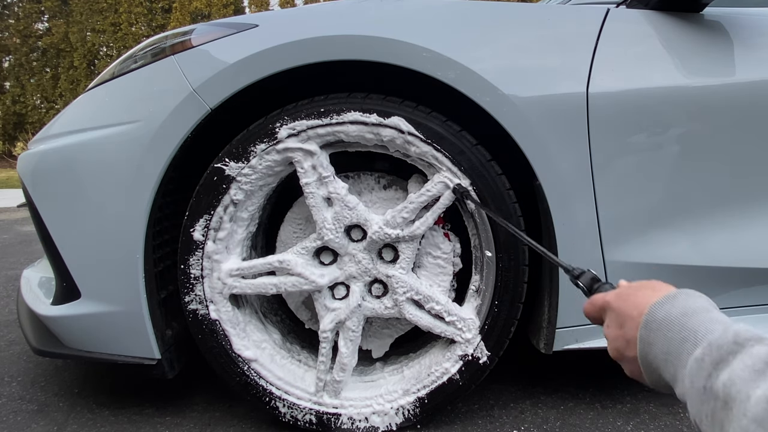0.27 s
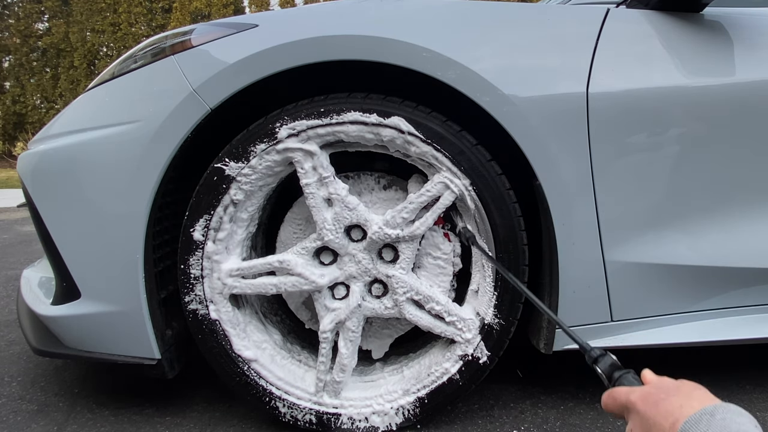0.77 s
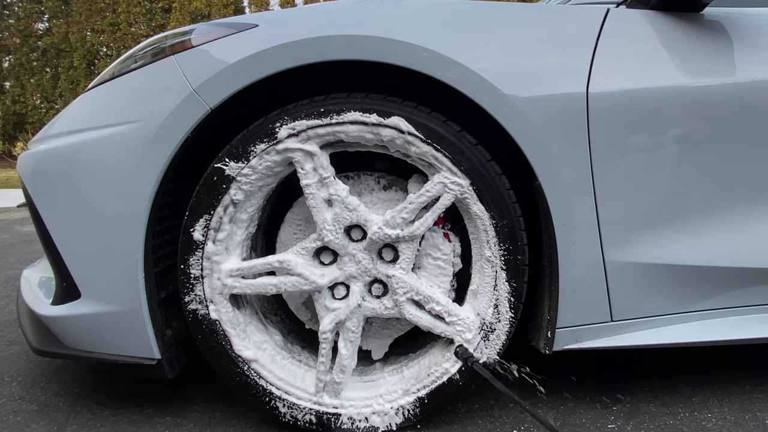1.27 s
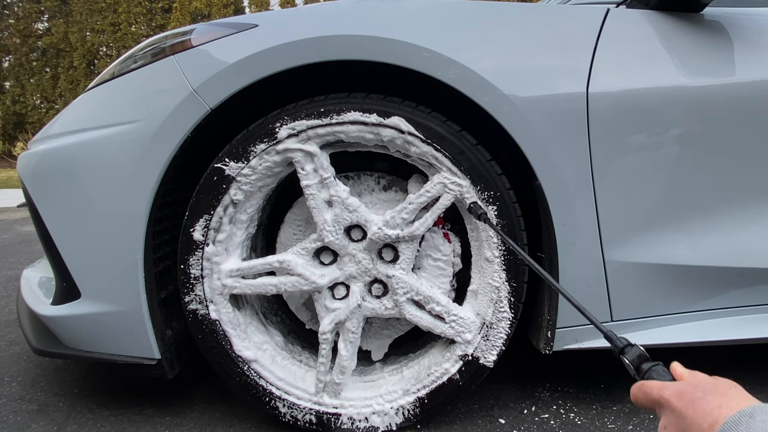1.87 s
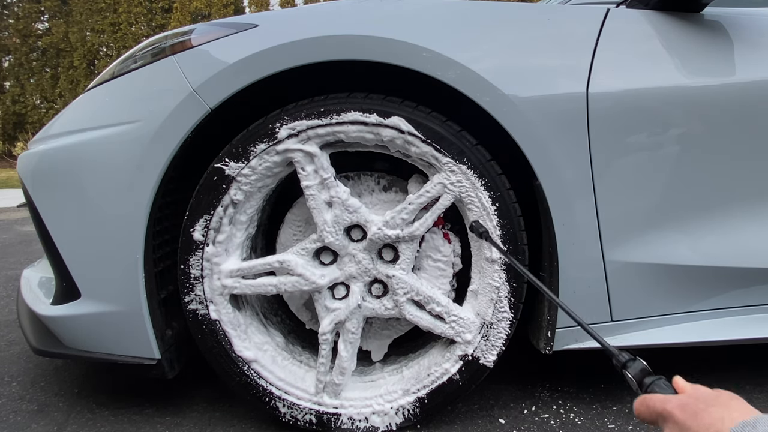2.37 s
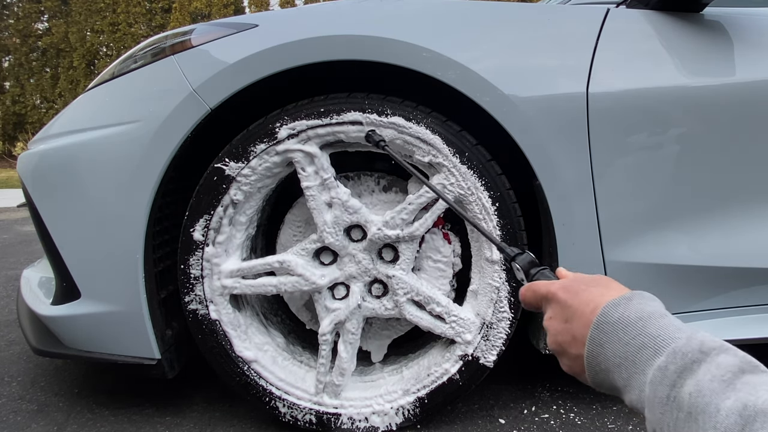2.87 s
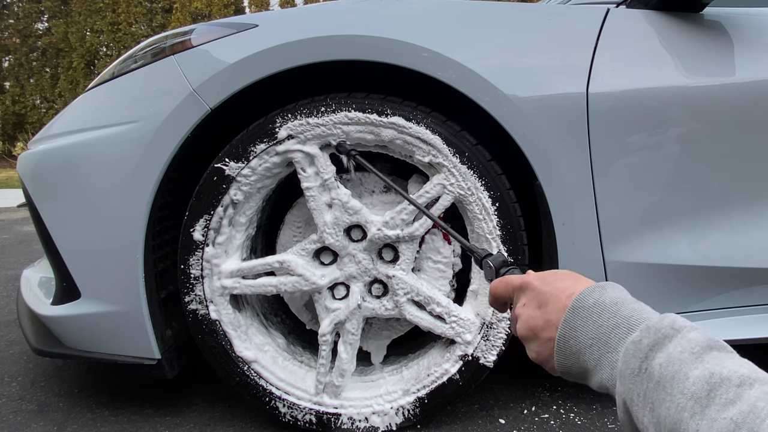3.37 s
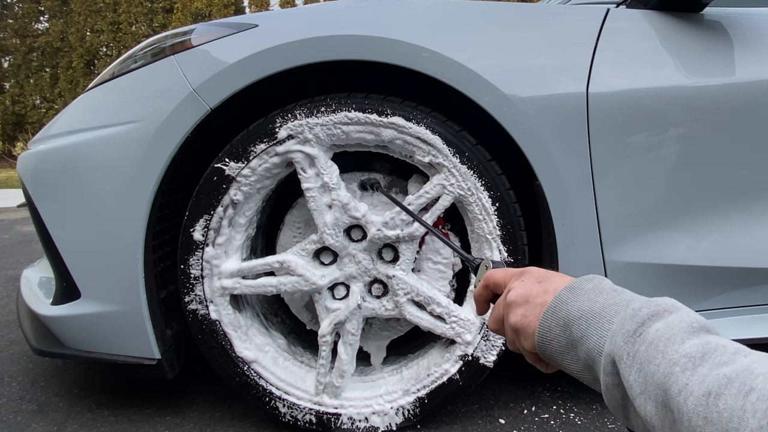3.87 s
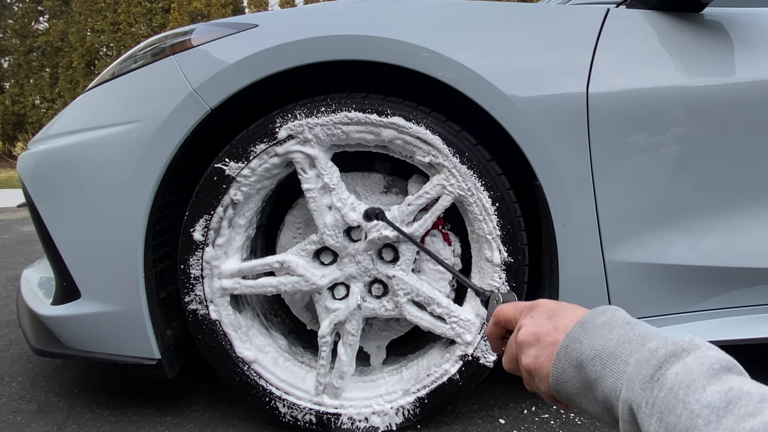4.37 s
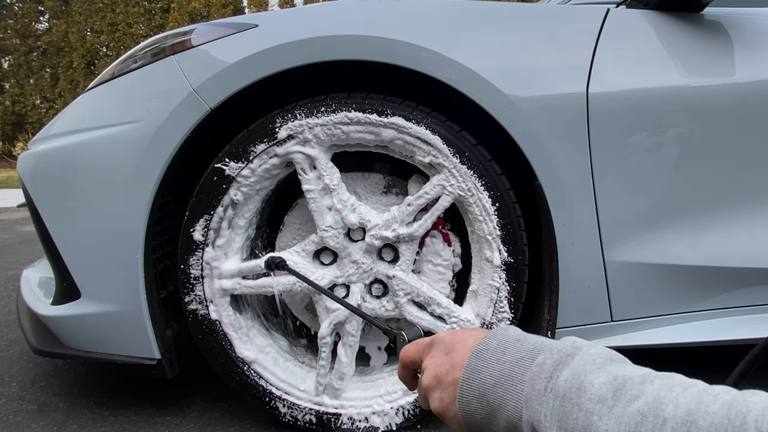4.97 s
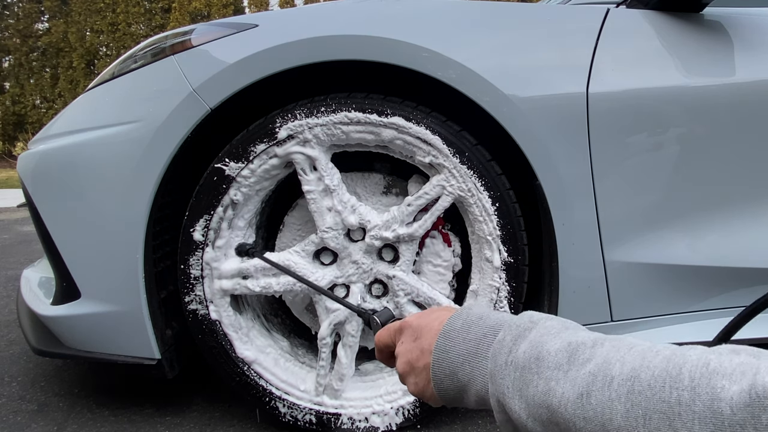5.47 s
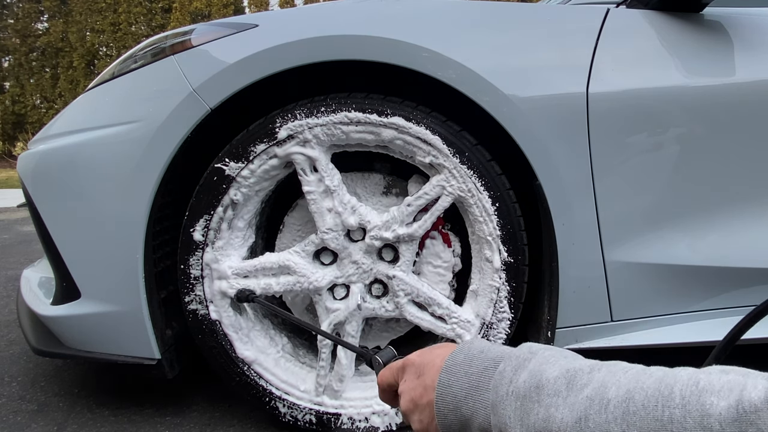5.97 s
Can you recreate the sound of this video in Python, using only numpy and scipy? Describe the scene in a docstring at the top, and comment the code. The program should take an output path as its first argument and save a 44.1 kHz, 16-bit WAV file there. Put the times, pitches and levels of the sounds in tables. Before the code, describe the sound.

A continuous high-pitched spray of air and foam strikes a car wheel, crackling with tiny bubbles and lightly coloured by the hollow rim. It starts softer, surges within half a second, and later flutters in quick swells while drifting from centre toward the left. Soft fizzing and brief squishy blips sit beneath. In open air, breeze thumps the microphone with dull rumbles, strongest near the end, over barely audible distant traffic.

```python
"""In a driveway, a hand-pump sprayer lays foam on a car wheel.
The nozzle sputters: random bubble bursts and a rush of air, coloured into a hiss and a finer sizzle.
The jet bounces off the wheel face as a sliding comb, and narrow resonances ring in the rim.
Foam patters as a coarser fizz and squelches in short gliding bands of noise.
A breeze buffets the microphone with low noise, gusts and popping eddies; far traffic murmurs beneath."""
import sys
import numpy as np
from scipy import signal
from scipy.fft import rfft, irfft, next_fast_len
from scipy.io import wavfile
from scipy.ndimage import uniform_filter1d, map_coordinates

SR = 44100
rng = np.random.default_rng(int(sys.argv[2]) if len(sys.argv) > 2 else 0)


def persist_wave(psi):
    """Save psi, clipped to +-1, as 16-bit WAV."""
    counts = np.round(np.clip(psi, -1, 1) * 32767).astype(np.int16)
    wavfile.write(sys.argv[1], SR, np.atleast_2d(counts).T)


N = 274743   # length of the scene in samples

# Jet strength as the wand moves, before the sweeps. Each row: time in seconds, hiss in dB, sizzle in dB.
JET_LEVEL = [(0, -46.5, -45), (.15, -46, -44.5), (.27, -42, -43), (.36, -45.5, -48.5), (.41, -40.5, -38),
             (.58, -39.5, -36.5), (.8, -40.5, -38.5), (1.03, -38.5, -38), (1.38, -44.5, -42),
             (1.65, -41.5, -38), (1.8, -45, -44), (1.92, -40, -41.5), (2.3, -41, -40.5),
             (2.6, -38.5, -37.5), (3.1, -40.5, -40), (3.6, -45.5, -41.5), (4.55, -45, -42.5),
             (5.7, -45.5, -42.5), (5.85, -43, -40), (6.23, -43.5, -47.5)]
# Swells as the jet crosses a spoke or the rim. Each row: time of the peak in seconds,
# length in seconds, hiss rise in dB, sizzle rise in dB.
SWEEPS = [(0.682, 0.071, 2.5, 1.5), (3.37, 0.14, 2.5, 3.5), (3.52, 0.094, 5.5, 2), (3.713, 0.13, 5.5, 3.5),
          (3.806, 0.047, 6.5, 1.5), (3.9, 0.038, 4, 5.5), (4.028, 0.12, 7, 3.5), (4.136, 0.043, 6, 2.5),
          (4.239, 0.067, 10.5, 6.5), (4.327, 0.057, 5, 5), (4.452, 0.075, 8, 5.5), (4.684, 0.13, 4, 4.5),
          (5.013, 0.13, 4, 6), (5.288, 0.14, 3.5, 7), (5.576, 0.12, 6, 4), (6.023, 0.14, 1.5, 2.5),
          (6.165, 0.27, 0, 6.5)]
# Where the jet points. Each row: time in seconds, ring of the rim in dB, gain of the top treble in dB.
AIM = [(0, 5, 2), (.6, -0.5, 2), (1.5, 7.5, 5), (2.6, -6, 3), (3.2, 9, 0.5), (4.3, 4, 1), (5.0, 6.5, -1.5),
       (5.6, -3, -1.5), (6.23, -1.5, 0)]
# Tone of the hiss. Each row: frequency in Hz, relative level in dB per Hz.
HISS_COLOUR = [(2100, -10), (3000, -16), (4000, -7.5), (5200, -5.5), (6150, -8.5), (6600, -8), (7250, -1),
               (7700, -2.5), (8700, -2), (9400, -0.5), (9900, -9)]
# Tone of the sizzle. Each row: frequency in Hz, relative level in dB per Hz.
SIZZLE_COLOUR = [(8900, -35), (9500, 3), (10400, 8), (11500, 8), (13000, 6.5), (14200, 3.5), (15800, -1)]
# Hollows of rim and spokes. Each row: frequency in Hz, bandwidth in Hz, relative gain in dB.
RIM_HOLLOWS = [(4970, 620, 0), (5705, 160, 6), (6490, 330, -2)]
RIM_WAVER_DB, RIM_WAVER_HZ = 1.5, 3.4   # spread and rate of each hollow's changing answer
# Bounce off the wheel along the wand path. Each row: time in seconds, delay in ms.
BOUNCE_DELAY = [(0, 1.3), (.31, 1.29), (.7, .62), (.95, 1.27), (1.25, .67), (1.4, 1.0), (1.66, 1.27),
                (1.8, 1.06), (2.11, 1.37), (2.36, 1.06), (2.65, 1.48), (3.8, 1.46), (4.15, 1.1),
                (4.5, 1.15), (4.85, .96), (5.5, 1.0), (5.8, .77), (6.23, .7)]
BOUNCE_GAIN = .28   # of the direct sound
# Nozzle direction. Each row: time in seconds, bearing (0 ahead of the microphone, .5 half left, 1 far left).
BEARING = [(0, .45), (.15, .44), (.33, .2), (.45, 0), (2.55, 0), (2.7, .14), (2.82, .27), (2.9, .42),
           (3.05, .52), (3.5, .54), (3.8, .48), (4.15, .48), (4.28, .42), (4.38, .28), (4.47, .46),
           (4.6, .54), (4.72, .85), (5.05, .85), (5.25, 1), (6.23, 1)]
# Noise that differs between left and right, relative to the direct jet.
# Each row: frequency in Hz, level in dB from ahead, from half left, from far left.
SIDE_NOISE = [(500, 0, -2.5, 7), (1290, 3, 5, -8), (2000, -11.5, -8, -5), (2450, -6, -0.5, -9),
              (2850, -2, -10, -23), (3400, -7, -17, -11), (3760, 4, -8, -8), (4450, -1, 2.5, -2),
              (5400, -2, -1, -6), (6230, 4, -2, -1), (7600, -3, 10, -1), (9100, 8, 8, -3),
              (10600, -21, -12, -6), (11600, -10, -6, -20), (12800, -16, 7, -16), (13700, -12, -25, -22),
              (14700, -8, -6, -15), (15700, 2, 15, -1)]
# Phase between the ports. Each row: frequency in Hz, left's lead in radians from ahead, half left, far left.
PORT_PHASE = [(0, 0, 0, 0), (2000, .3, 1.6, 1.8), (2500, .55, 2.55, 2.75), (2850, .75, 3, 3.15),
              (3300, .8, 3.15, 3.6), (4000, .6, 3.3, 4.9), (4600, 1.4, 3.8, 5.6), (5600, 2.8, 4.1, 5.9),
              (6000, 3.8, 4.5, 6.2), (6400, 6.3, 4.9, 6.3), (7100, 7.1, 5.6, 6.6), (7750, 9.3, 6.6, 9.3),
              (8200, 10.6, 8.8, 11.4), (8750, 11.5, 9.2, 12), (9400, 9.1, 8.7, 9.3), (9800, 7.3, 7.3, 7.3),
              (10400, 6.3, 6.3, 6.3), (11600, 6.2, 6.2, 6.2), (13150, 3.25, 3.25, 3.25),
              (13700, 3.05, 3.05, 3.05), (15300, 0, 0, 0)]
# Balance of the ports. Each row: frequency in Hz, left minus right in dB from ahead, half left, far left.
PORT_BALANCE = [(1400, -1, 3.5, 2), (2400, 0, -1.5, 5), (2870, -4, 2, -8.5), (3300, 8, 2.5, 9),
                (3800, -6, 3.5, 3), (4460, 0.5, 0, 5.5), (5530, 0, 4.5, 5.5), (6440, 0.5, 1.5, 0),
                (7300, 3, -0.5, 0), (9000, -0.5, 2, 0.5), (10600, -1.5, -2.5, -2.5),
                (12800, -0.5, 0.5, 0.5)]
# Tone with direction. Each row: frequency in Hz, gain in dB from ahead, half left, far left.
PORT_GAIN = [(1400, -0.5, 0.5, 0), (2430, 0, 3, -4.5), (3080, -1, 2, -1.5), (3700, 1.5, 4, 6),
             (4600, 1.5, -1.5, 1), (5500, 1.5, -1.5, 0.5), (6330, 2.5, 5, 5.5), (7000, 1.5, -1.5, 0.5),
             (8750, 1.5, 3, -0.5), (10540, 1.5, -0.5, -0.5), (12900, -0.5, 0.5, -0.5)]
FRAME, HOP = 1024, 256   # short spectra used for the ports, in samples

# Foam landing as the jet moves over the wheel, before the sweeps. Each row: time in seconds, level in dB.
PATTER_LEVEL = [(0, -49), (.35, -48), (.75, -49.5), (1.0, -47.5), (1.45, -48), (1.75, -48), (2.0, -48.5),
                (2.5, -45.5), (3.0, -49.5), (4.2, -53.5), (4.8, -52), (5.7, -53), (6.23, -46.5)]
# Tone of the patter. Each row: frequency in Hz, relative level in dB per Hz.
PATTER_COLOUR = [(400, -0.5), (800, 0), (1400, -1.5), (2100, 1), (2600, 3.5), (3200, 5), (4200, -4.5)]
PATTER_FOLLOWS = 1   # share of a sweep's hiss rise that the patter takes on
# Pockets the jet digs into wet foam. Each row: time of the peak in seconds, pitch there in Hz,
# glide in Hz over one length, length in seconds, level in dB.
SQUELCHES = [(.299, 2400, 0, 0.014, -44), (0.319, 1610, 100, 0.02, -45), (.362, 2550, 253, 0.019, -43.5),
             (0.41, 2610, 100, 0.026, -46), (.6, 1140, 7, 0.29, -56), (.646, 6760, 250, 0.15, -42),
             (0.946, 1587, 180, 0.046, -46.5), (.982, 2460, 102, 0.034, -45.5),
             (1.253, 1270, 0, 0.014, -50), (1.713, 2343, 0, 0.05, -50), (1.786, 1270, 0, 0.032, -51),
             (2.216, 1720, 146, 0.079, -49.5), (2.515, 1640, -300, 0.19, -50),
             (3.806, 1780, 0, 0.006, -47.5)]

# Light breeze on the microphone. Each row: time in seconds, level in dB.
BREEZE_LEVEL = [(0, -51), (.4, -49.5), (1.1, -49.5), (1.55, -55), (2.5, -51.5), (3.3, -52), (4.15, -52.5),
                (4.55, -59), (5.05, -57), (5.2, -52.5), (6.23, -55)]
BREEZE_RUMBLE_DB = 4.5   # boost of the breeze's deep part
# Gusts. Each row: time of full strength in seconds, hold in seconds, left level in dB, right level in dB,
# boost of the deep rumble in dB on the left, on the right.
GUSTS = [(0.574, 0.2, -49.5, -53.5, 15, 16), (0.903, 0.094, -44, -53, 14, 20),
         (1.15, 0.041, -40.5, -55, 3, 4), (1.673, 0.044, -37.5, -48.5, 3.5, -5),
         (2.79, 0.092, -41, -49.5, 3.5, 7), (3.638, 0.11, -48, -47, -2, -9),
         (3.852, 0.042, -45, -42.5, 1, 2), (4.126, 0.012, -50, -53, -3, -5), (4.3, .015, -55, -62, 0, 0),
         (5.222, 0.055, -42.5, -52, -5, -10), (5.327, .135, -34.5, -41.5, 0.5, -3),
         (5.534, 0.14, -35, -47, -3, 2), (6.158, 0.015, -46, -53, 7, 5)]
GUST_RISE_S, GUST_FALL_S = 0.03, 0.038   # time constants
GUST_EVEN_S = 0.0407   # turbulence is levelled over this window before the gusts shape it
# Tone of the wind. Each row: frequency in Hz, relative level in dB per Hz.
WIND_COLOUR = [(24, -37), (48, -3.5), (80, -0.5), (150, -3), (260, -5.5), (400, -14.5), (650, -25),
               (1500, -35)]
# Single eddies that pop on the ports. Each row: start in seconds, starting pitch in Hz,
# left level in dB before the fade and low cut.
EDDIES = [(.901, 138, -16), (.984, 198, -36), (3.849, 266, -30), (3.881, 480, -33), (3.898, 920, -31.5),
          (3.959, 260, -30.5), (4.045, 282, -32), (4.3, 170, -30.5), (4.33, 393, -35), (4.412, 332, -34.5),
          (5.34, 620, -31.5)]
# Tone of the far traffic. Each row: frequency in Hz, relative level in dB per Hz.
TRAFFIC_COLOUR = [(24, -41), (50, -19), (76, 13.5), (105, -41), (250, -9.5), (450, -9.5), (900, 2.5),
                  (1500, -2), (2100, -9.5)]
CUTOFF_HZ = 15850   # top of the whole mix


def hiss(slugs):
    """The body of the jet: bubbly noise in sputtering flow, with the rim's hollows ringing along; rms 1."""
    ring_db, _ = in_time(AIM)
    flow = sputter(slugs, slug_db=1.14, spit_db=2.0, spit_hz=440)
    jet = off_the_wheel(flow * fizz(per_s=5500, spread_db=7.0))
    heard = at_ports(jet, flow, patchy_db=4.5, width_hz=35, length_s=0.027)
    rim = 0
    for hz, width_hz, db in RIM_HOLLOWS:
        answer = from_db(db + RIM_WAVER_DB * drift(RIM_WAVER_HZ))
        rim = rim + answer * resonance(heard, hz, width_hz)
    return colour(heard + from_db(ring_db) * rim, HISS_COLOUR)


def sizzle(slugs):
    """The finest bubbles, bursting right at the nozzle; their top treble changes with the aim; rms 1."""
    _, top_db = in_time(AIM)
    flow = sputter(slugs, slug_db=0.84, spit_db=2.0, spit_hz=900)
    jet = off_the_wheel(flow * fizz(per_s=9700, spread_db=7.5))
    heard = at_ports(jet, flow, patchy_db=3.5, width_hz=140, length_s=0.012)
    top = filtered(heard, lambda hz: 1 / (1 + (13500 / hz) ** 30))
    return colour(heard + (from_db(top_db) - 1) * top, SIZZLE_COLOUR)


def sputter(slugs, slug_db, spit_db, spit_hz):
    """Slugs of foam and air take turns in the nozzle and break into spits; tank pressure caps each surge."""
    surge_db = slug_db * slugs + spit_db * drift(spit_hz)
    return rms_one(from_db(np.minimum(surge_db, 2.8)))


def fizz(per_s, spread_db):
    """Tiny bubbles burst at random, in uneven sizes, over an equally loud rush of air; rms 1."""
    size_db = spread_db * np.minimum(rng.exponential(1, N), 3)
    sizes = from_db(size_db) * rng.choice([-1, 1], N)
    bursts = rms_one(sizes * (rng.random(N) < per_s / SR))
    return rms_one(bursts + rng.standard_normal(N))


def sweeps():
    """Rise of hiss and sizzle in dB: a smooth bell for each pass of the jet."""
    t = np.arange(N) / SR
    rise = 0
    for peak, length, *rise_db in SWEEPS:
        bell = np.exp(-(2 * (t - peak) / length) ** 2)
        rise = rise + np.outer(rise_db, bell)
    return rise


def off_the_wheel(x):
    """The direct sound and its bounce off the wheel face form a faint comb that slides with the wand."""
    bounce_ms, = in_time(BOUNCE_DELAY)
    return rms_one(x + BOUNCE_GAIN * delayed(x, bounce_ms))


def at_ports(x, flow, patchy_db, width_hz, length_s):
    """Bearing sets phase, tone and side noise at two ports; spokes and foam make shifting patches."""
    sources = np.vstack([x, flow * rng.standard_normal((2, N))])
    hz, s, frames = signal.stft(sources, SR, nperseg=FRAME, noverlap=FRAME - HOP)
    direct, side_noise = frames[0], frames[1:]
    side = np.array([.5, -.5])[:, None, None]   # left, right
    bearing = np.interp(s, *np.transpose(BEARING))
    # shares of the ahead, half-left and far-left columns at each moment
    shares = np.array([np.interp(bearing, [0, .5, 1], one) for one in np.eye(3)])

    def turned(table):
        """A table's spectrum for the bearing at each moment."""
        return np.transpose(over_hz(table, hz)) @ shares

    phase = turned(PORT_PHASE)
    noise_level = from_db(turned(SIDE_NOISE))
    patch_db = patchy_db * patches(direct.shape, width_hz, length_s)
    gain = from_db(turned(PORT_GAIN) + side * turned(PORT_BALANCE) + patch_db)
    mixed = direct * np.exp(1j * side * phase) + noise_level * side_noise
    ports = gain * mixed / np.sqrt(1 + noise_level ** 2)
    return rms_one(signal.istft(ports, SR, nperseg=FRAME, noverlap=FRAME - HOP)[1][..., :N])


def patches(shape, width_hz, length_s):
    """Smooth chance over pitch and time, for short spectra; spread 1."""
    steps = np.arange(-24, 25)
    over_pitch = np.exp(-(steps * SR / FRAME / width_hz) ** 2)
    over_time = np.exp(-(steps * HOP / SR / length_s) ** 2)
    grain = rng.standard_normal(np.add(shape, len(steps) - 1))
    return rms_one(signal.fftconvolve(grain, np.outer(over_pitch, over_time), "valid"))


def patter(slugs):
    """Clots of foam land softly on the coated wheel: a sparser fizz that swells with the jet."""
    hiss_rise_db = sweeps()[0]
    level_db = in_time(PATTER_LEVEL)[0] + PATTER_FOLLOWS * hiss_rise_db
    flow = sputter(slugs, slug_db=1.0, spit_db=2.5, spit_hz=250)
    landing = off_the_wheel(flow * fizz(per_s=1400, spread_db=3.0))
    heard = at_ports(landing, flow, patchy_db=5.0, width_hz=47, length_s=0.016)
    return from_db(level_db) * colour(heard, PATTER_COLOUR)


def squelches(width_hz):
    """Air pockets in the foam ring roughly for a moment under the jet, gliding as they fill or widen."""
    t = np.arange(N) / SR
    out = np.zeros(N)
    rough = drift(width_hz) + 1j * drift(width_hz)
    for peak, hz, glide_hz, length, db in SQUELCHES:
        age = (t - peak) / length
        tone = np.exp(2j * np.pi * (hz + glide_hz * age / 2) * (t - peak))
        out += from_db(db) * np.real(rough * tone) * np.exp(-2 * age ** 2)
    return out


def wind(lumpy_db, crossing_ms, shared):
    """Lumpy turbulence, partly carried from left port to right; gusts ride on the breeze with deep rumble."""
    lumps = from_db(lumpy_db * np.tanh([drift(63), drift(43)]))
    at_left = rng.standard_normal(N)
    at_right = filtered(at_left, lambda hz: np.exp(-2j * np.pi * hz * crossing_ms / 1000))   # pure delay
    carried = np.array([at_left, at_right])
    air = colour((rng.standard_normal((2, N)) + shared * carried) * lumps, WIND_COLOUR)
    air = air / np.sqrt(uniform_filter1d(air ** 2, int(GUST_EVEN_S * SR)) + 1e-9)
    deep = filtered(air, lambda hz: 1 / (1 + (hz / 115) ** 4))
    power = from_db(in_time(BREEZE_LEVEL)) ** 2
    deep_power = power * from_db(BREEZE_RUMBLE_DB) ** 2
    for start, hold, left_db, right_db, *rumble_db in GUSTS:
        blow = (from_db([[left_db], [right_db]]) * gust(start, hold)) ** 2
        power = power + blow
        deep_power = deep_power + blow * from_db(rumble_db)[:, None] ** 2
    return np.sqrt(power) * (air - deep) + np.sqrt(deep_power) * deep


def gust(start, hold):
    """A gust builds quickly to full strength at its start time, holds and dies away."""
    age = np.arange(N) / SR - start
    return np.exp(np.minimum(age, 0) / GUST_RISE_S - np.maximum(age - hold, 0) / GUST_FALL_S)


def eddies(fade_s, sink_s, right_db):
    """An eddy pops on the left port, its pitch sinking as it spreads; right_db sets the right port's share."""
    t = np.arange(N) / SR
    out = np.zeros(N)
    for start, hz, db in EDDIES:
        age = np.clip(t - start, 0, .2)
        cycles = hz * sink_s * np.log1p(age / sink_s)
        out += from_db(db) * np.exp(-age / fade_s) * np.sin(2 * np.pi * cycles)
    low_cut = filtered(out, lambda hz: 1 / (1 + (45 / hz) ** 4))
    return low_cut * from_db([[0], [right_db]])


def traffic():
    """Far traffic: steady coloured noise, partly shared by both sides and a little louder on the left."""
    murmur = rng.standard_normal((2, N)) + 0.27 * rng.standard_normal(N)
    return from_db(-54.5) * colour(murmur, TRAFFIC_COLOUR) * from_db([[.8], [-.8]])


def from_db(db):
    """Decibels to amplitude."""
    return 10 ** (np.asarray(db) / 20)


def rms_one(x):
    """Scale x to an overall rms of 1."""
    return x / np.sqrt(np.mean(x ** 2) + 1e-20)


def in_time(rows):
    """Each column of a curve at every sample."""
    s, *columns = np.transpose(rows)
    return [np.interp(np.arange(N) / SR, s, c) for c in columns]


def at_hz(points, hz):
    """A tone curve at these frequencies, straight over log frequency."""
    at, value = np.transpose(points)
    return np.interp(np.log(hz), np.log(at), value)


def over_hz(points, hz):
    """Each column of a spectrum at these frequencies, straight over plain frequency."""
    at, *columns = np.transpose(points)
    return [np.interp(hz, at, c) for c in columns]


def filtered(x, response):
    """Pass x through a response given as a function of Hz."""
    size = next_fast_len(N + 4096)
    hz = np.maximum(np.arange(size // 2 + 1) * SR / size, 1)
    return irfft(rfft(x, size) * response(hz), size)[..., :N]


def colour(x, points):
    """Filter x by a tone curve that falls away steeply past both ends; rms 1."""
    lowest, highest = points[0][0], points[-1][0]

    def response(hz):
        """The curve between its ends, sixth-power slopes outside."""
        edge = np.minimum(1, np.minimum(hz / lowest, highest / hz)) ** 6
        return edge * from_db(at_hz(points, hz))

    return rms_one(filtered(x, response))


def drift(rate_hz):
    """Smooth chance, flat up to rate_hz; spread 1."""
    return rms_one(filtered(rng.standard_normal(N), lambda hz: 1 / np.sqrt(1 + (hz / rate_hz) ** 6)))


def resonance(x, hz, width_hz):
    """Two-pole resonance, gain about 1 on top."""
    r = np.exp(-np.pi * width_hz / SR)
    feed = np.array([1, 0, -1]) * (1 - r * r) / 2
    return signal.lfilter(feed, [1, -2 * r * np.cos(2 * np.pi * hz / SR), r * r], x)


def delayed(x, ms):
    """Read x a changing time late."""
    return map_coordinates(x, [np.arange(N) - ms * SR / 1000], order=5)


def scene():
    """Jet, foam, traffic and wind together; the same slugs drive hiss, sizzle and patter."""
    hiss_db, sizzle_db = in_time(JET_LEVEL) + sweeps()
    slugs = drift(89)
    jet = from_db(hiss_db) * hiss(slugs) + from_db(sizzle_db) * sizzle(slugs)
    foam = patter(slugs) + squelches(width_hz=185)
    breeze = wind(lumpy_db=3.5, crossing_ms=0.8, shared=0.66)
    pops = eddies(fade_s=0.0075, sink_s=0.0048, right_db=-27)
    return jet + foam + traffic() + breeze + pops


def record(dry):
    """The top is cut steeply."""
    return filtered(dry, lambda hz: 1 / np.sqrt(1 + (hz / CUTOFF_HZ) ** 300))


dry = scene()
out = record(dry)
persist_wave(out)
```